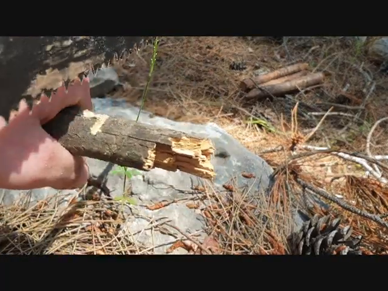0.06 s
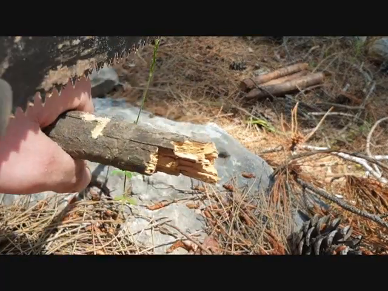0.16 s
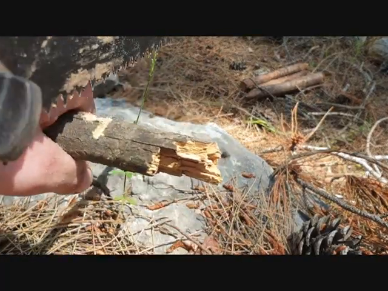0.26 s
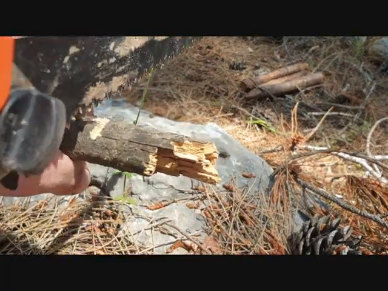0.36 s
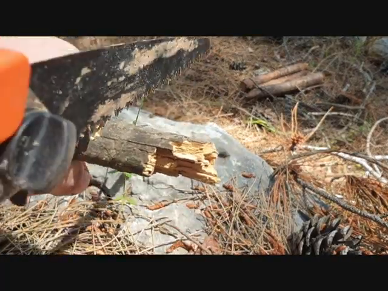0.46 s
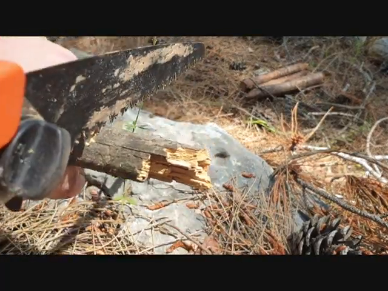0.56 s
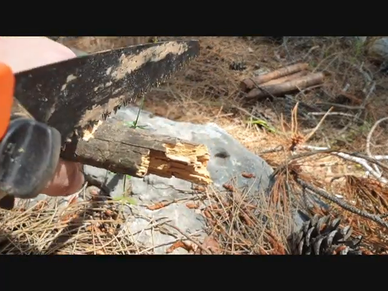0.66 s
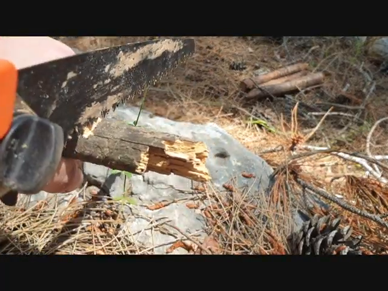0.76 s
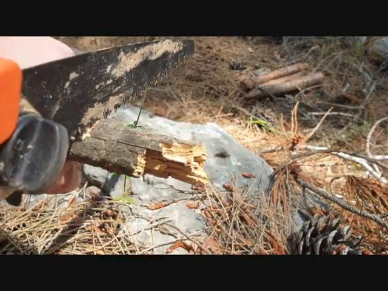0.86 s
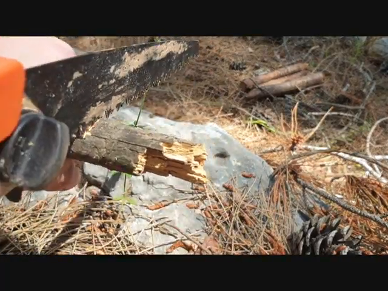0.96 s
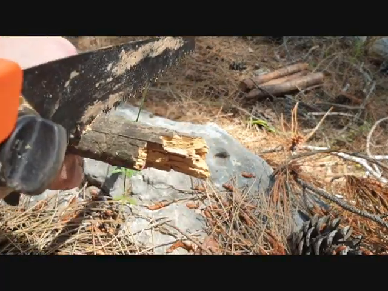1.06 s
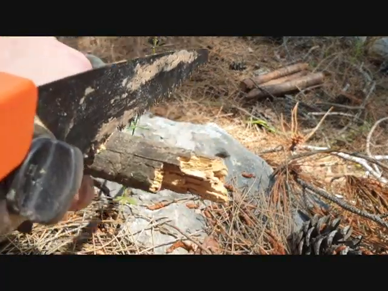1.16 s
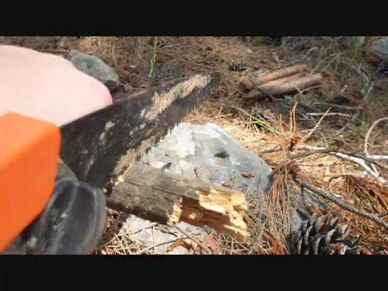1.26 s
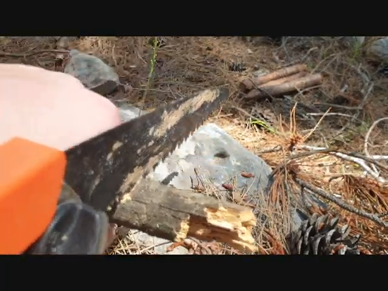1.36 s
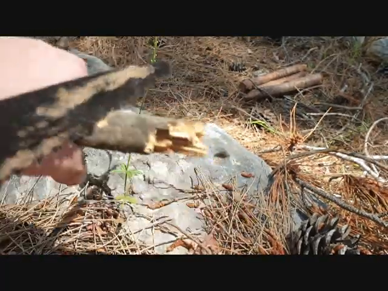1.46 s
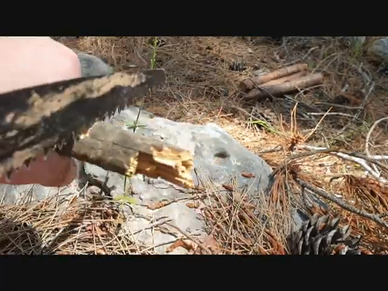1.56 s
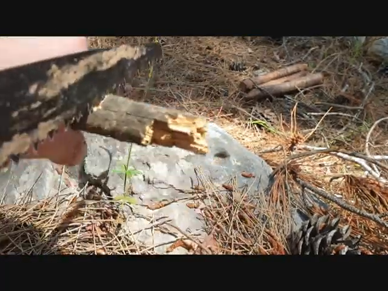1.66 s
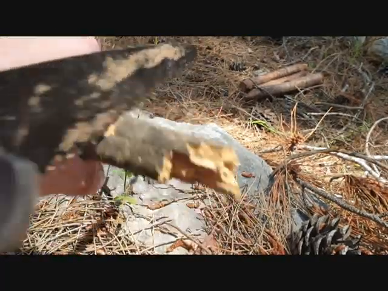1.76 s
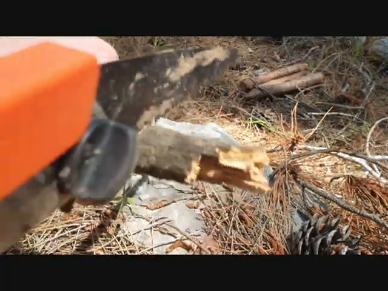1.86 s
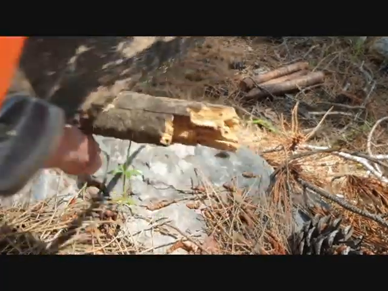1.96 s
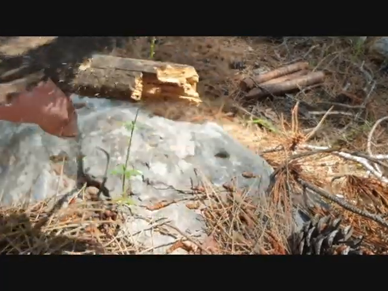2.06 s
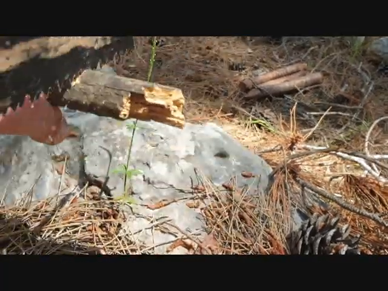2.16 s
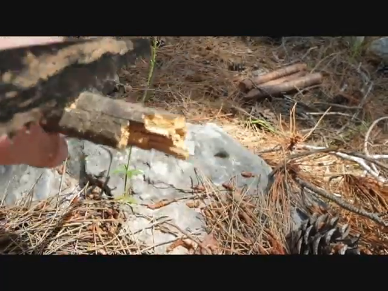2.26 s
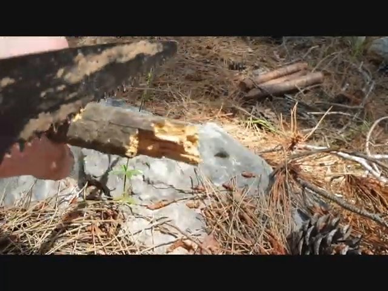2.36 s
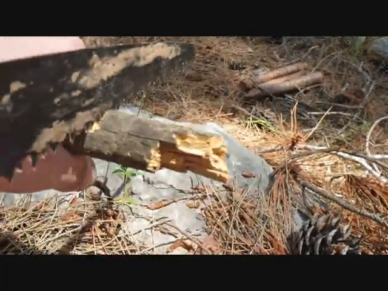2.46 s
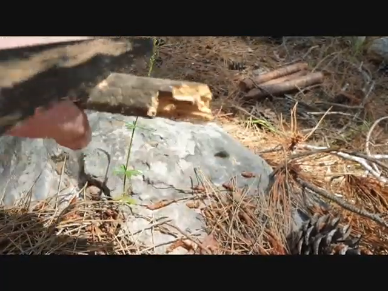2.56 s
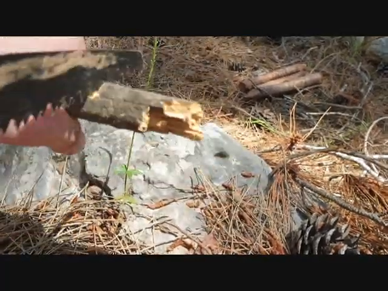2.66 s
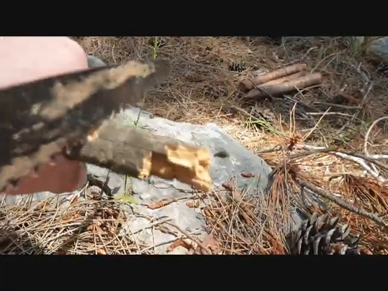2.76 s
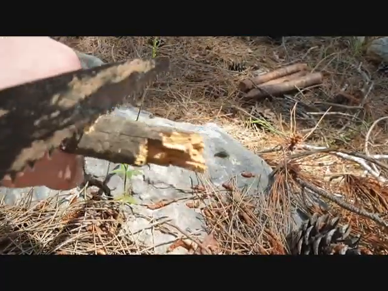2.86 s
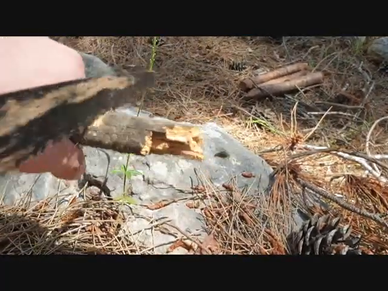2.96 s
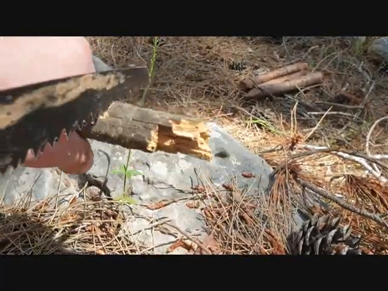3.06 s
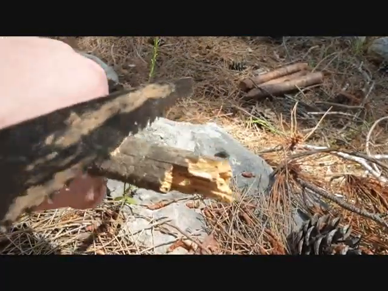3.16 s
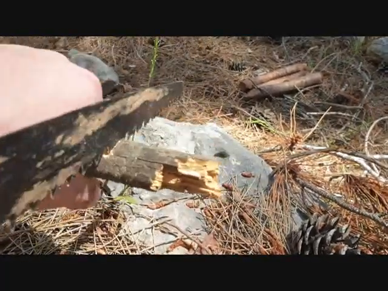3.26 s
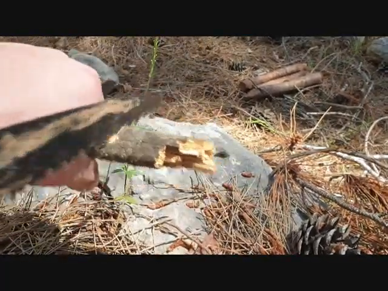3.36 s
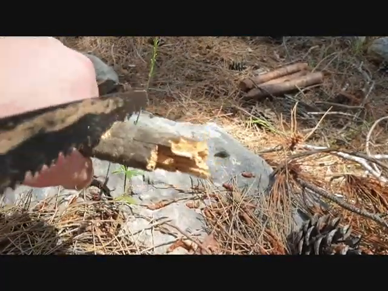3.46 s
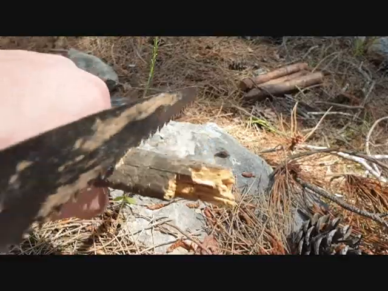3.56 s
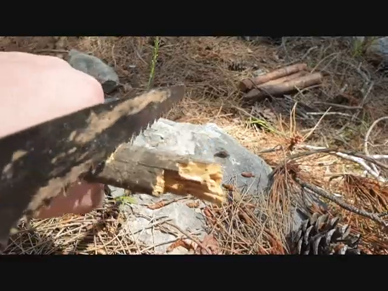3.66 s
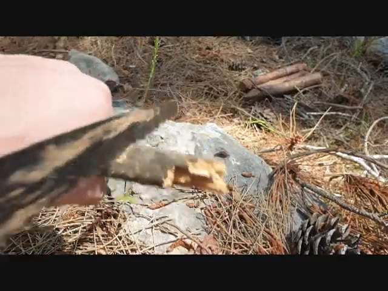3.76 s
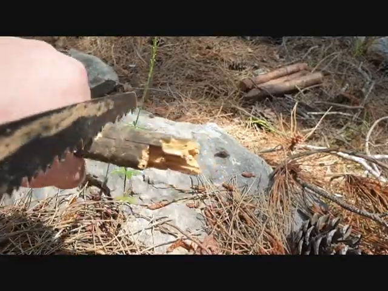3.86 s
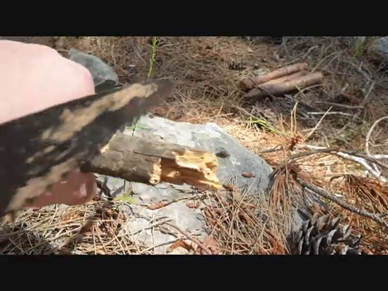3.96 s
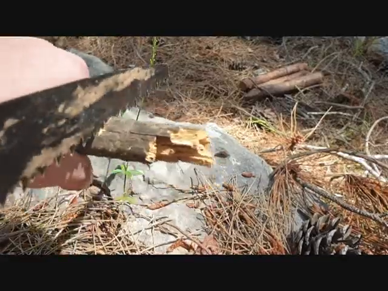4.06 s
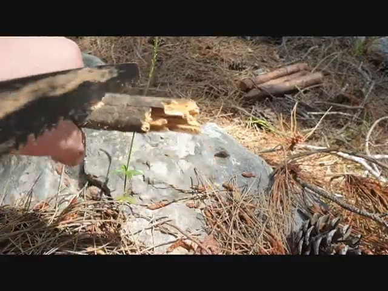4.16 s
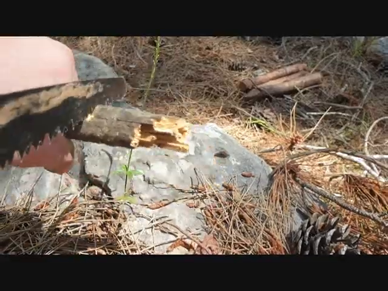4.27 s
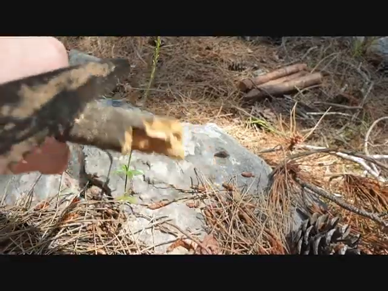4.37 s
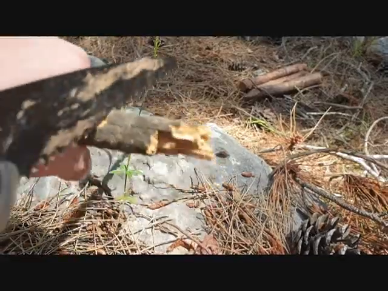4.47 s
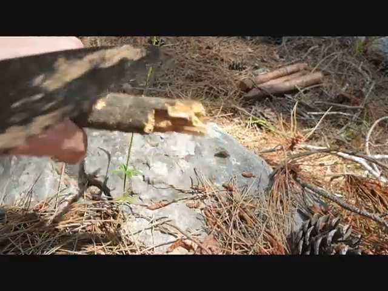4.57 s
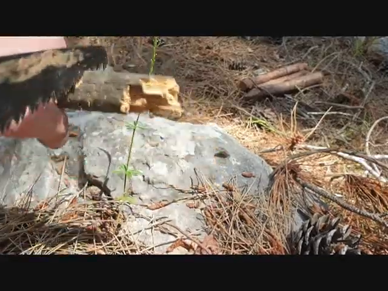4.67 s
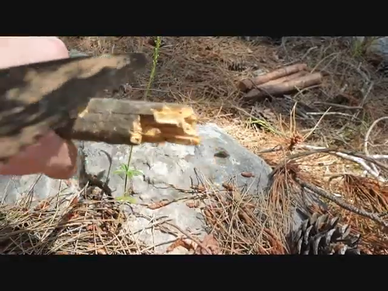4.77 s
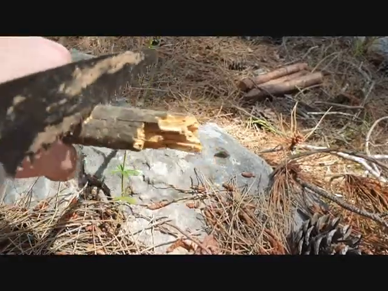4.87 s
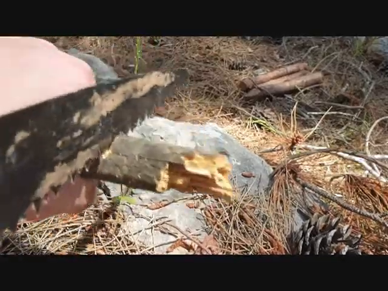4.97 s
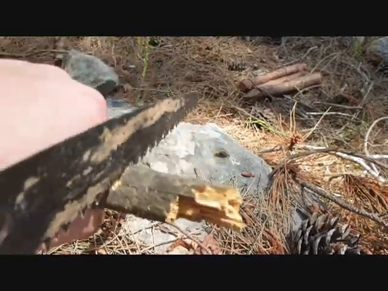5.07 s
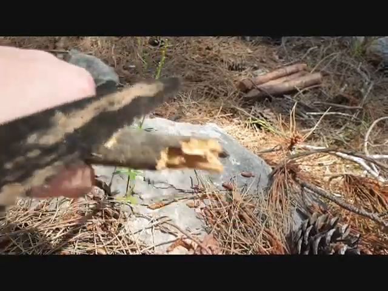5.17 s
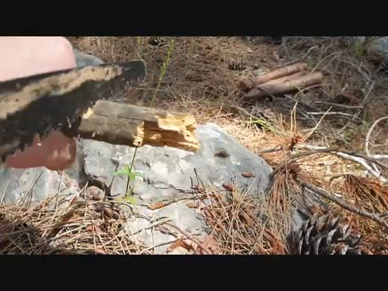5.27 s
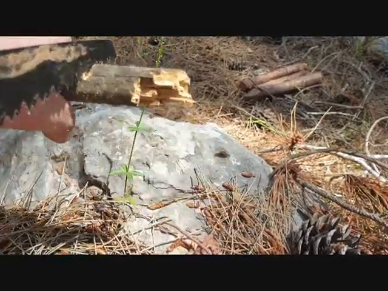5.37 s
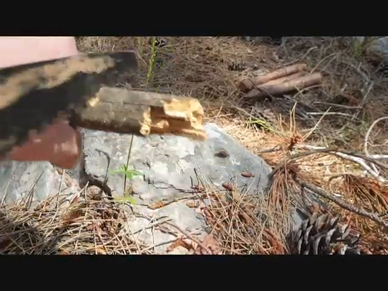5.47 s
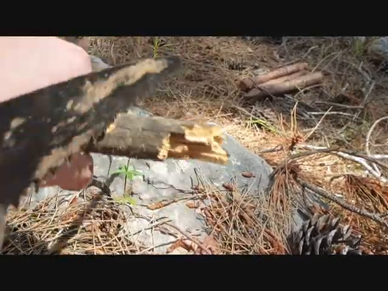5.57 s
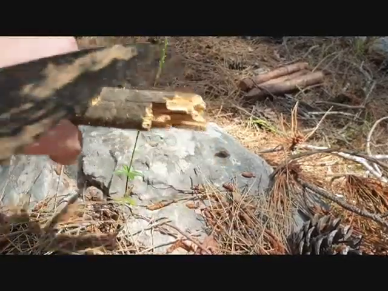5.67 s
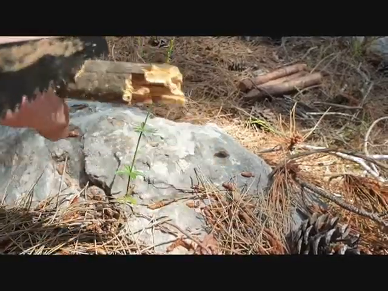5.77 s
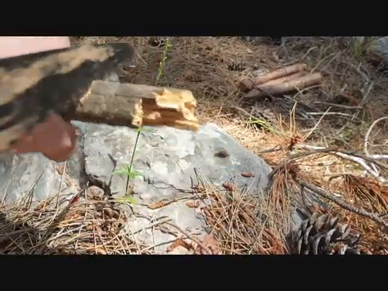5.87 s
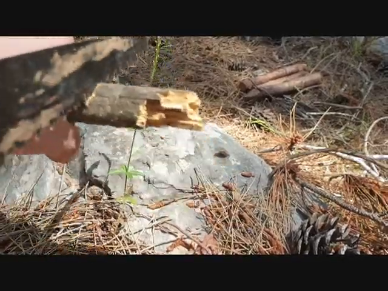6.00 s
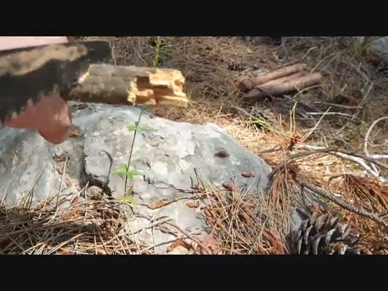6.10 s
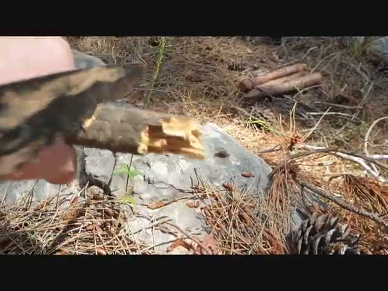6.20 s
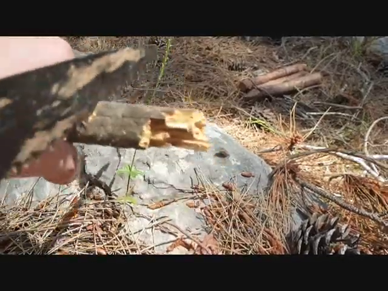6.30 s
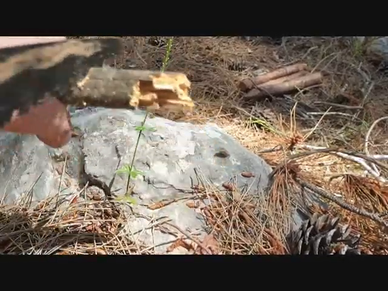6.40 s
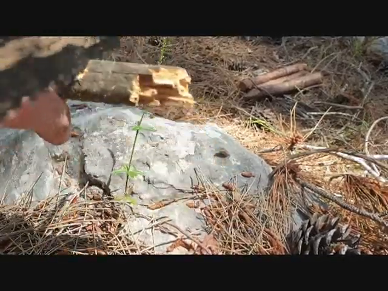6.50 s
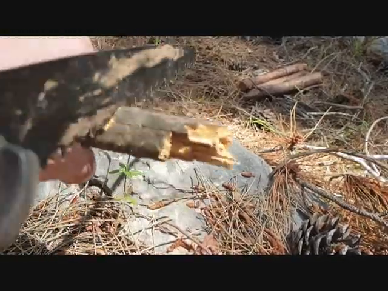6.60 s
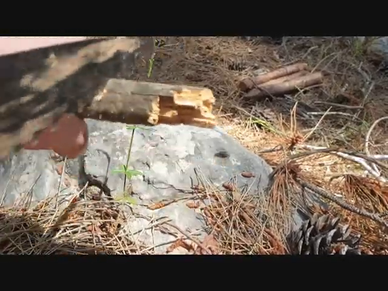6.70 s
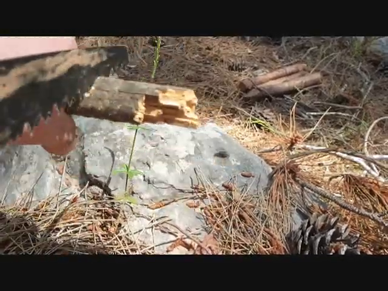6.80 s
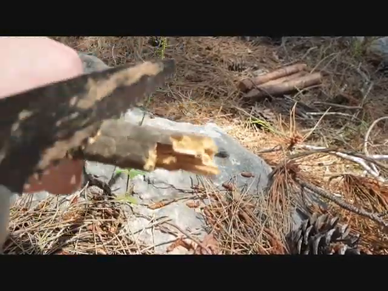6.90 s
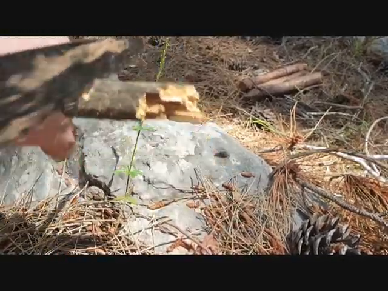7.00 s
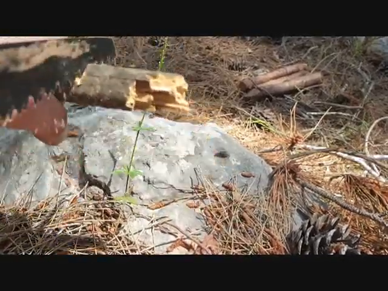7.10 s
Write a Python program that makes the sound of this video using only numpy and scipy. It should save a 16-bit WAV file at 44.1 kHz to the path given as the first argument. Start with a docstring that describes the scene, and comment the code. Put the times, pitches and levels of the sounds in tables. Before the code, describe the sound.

A saw catches dry wood with a crackling bite, then cuts in quick uneven strokes, tearing and ringing thinly, over very faint outdoor hum and hiss.

```python
"""Folding saw on a dry stick

A folding saw is set on a dry stick, then cuts back and forth in spells, close to the left port of a small
camera. Fibres break as dense random clicks, filtered into tearing, bite and wood, ringing modes of blade and
stick; stroke envelopes swell each cut, single teeth snag. Dull knocks and low rumble come through the hands.
Outdoors: a very faint noise scatter, a far hum and hiss of filtered noise."""
import sys
import numpy as np
from scipy import signal
from scipy.fft import rfft, irfft
from scipy.io import wavfile
from scipy.ndimage import uniform_filter1d

SR = 44100
rng = np.random.default_rng(int(sys.argv[2]) if len(sys.argv) > 2 else 0)


def waveform_to_disk(signal):
    """Save audio, clipped to [-1, 1], as 16-bit WAV at the path in sys.argv[1]."""
    frames = np.transpose(np.atleast_2d(signal))
    scaled = np.clip(frames, -1, 1) * 32767
    samples = np.round(scaled).astype(np.int16)
    wavfile.write(sys.argv[1], SR, samples)


def magnitude_from_level(level_db):
    """Linear magnitude for a level in decibels (20 dB per decade)."""
    exponent = np.asarray(level_db, float) / 20
    return 10 ** exponent


N = 314874

# Saw strokes: fastest moment t/s, rise/s, fall/s, relative tearing level/dB, wood body over it/dB
STROKES = [(1.001, 0.021, 0.039, -57.5, 1.5), (1.149, 0.002, 0.065, -52, -8.5),
           (1.544, 0.035, 0.089, -20.5, -17), (1.906, 0.078, 0.093, -30, -13),
           (2.145, 0.13, 0.12, -29, -11.5), (2.37, 0.097, 0.13, -34, -10.5),
           (2.657, 0.05, 0.085, -24, -14.5), (2.85, 0.041, 0.12, -28, -11),
           (3.086, 0.063, 0.084, -26.5, -14), (3.271, 0.071, 0.078, -29.5, -9),
           (3.492, 0.088, 0.062, -29, -14), (3.665, 0.097, 0.066, -28, -11),
           (3.89, 0.048, 0.09, -24.5, -15), (4.067, 0.063, 0.085, -26.5, -9),
           (4.246, 0.04, 0.1, -25.5, -14.5), (4.475, 0.061, 0.12, -27, -10),
           (4.718, 0.08, 0.078, -22.5, -16.5), (4.857, 0.041, 0.11, -22.5, -14.5),
           (5.285, 0.039, 0.096, -28.5, -11.5), (5.458, 0.097, 0.057, -33, -8.5),
           (5.613, 0.08, 0.095, -26.5, -7), (5.821, 0.072, 0.071, -21.5, -18),
           (5.996, 0.058, 0.078, -22, -12), (6.191, 0.086, 0.06, -23, -14),
           (6.341, 0.101, 0.068, -25.5, -11.5), (6.498, 0.057, 0.074, -21.5, -17.5),
           (6.654, 0.058, 0.081, -22, -12.5), (6.836, 0.13, 0.063, -24, -13.5),
           (6.986, 0.081, 0.064, -23, -10.5), (7.135, 0.086, 0.08, -25.5, -12)]
# A tooth snags and lets go: t/s, relative peak level/dB, reach into bite and wood/dB
SNAGS = [(0.594, -57, 5), (0.6103, -53.5, 3), (0.773, -55, 9), (0.7876, -47, -1), (0.8312, -60.5, 14.5),
         (0.9965, -50, 5), (1.009, -43.5, 10.5), (1.151, -30.5, 3), (1.1564, -41.5, 15), (1.1749, -42, -4),
         (1.5203, -25, 4), (1.529, -11, 2.5), (1.545, -13, 0.5), (1.5568, -8.5, -3.5), (1.5705, -11, 0.5),
         (1.58, -12.5, -2), (1.604, -21.5, 3.5), (1.6249, -26, 6), (1.8096, -44, -15), (1.8388, -36, -11),
         (1.8596, -28, 9), (1.892, -18, -6), (1.9005, -14.5, 4), (1.9195, -14.5, 5), (1.9724, -30, -5),
         (1.991, -37.5, 12), (2.003, -31.5, 7.5), (2.012, -33, 4), (2.125, -14.5, 6), (2.1694, -26.5, 9),
         (2.2993, -32, -4), (2.3218, -24, -6), (2.3328, -25, 4), (2.3489, -13, -1), (2.381, -24, -9),
         (2.4037, -17.5, -0.5), (2.4873, -33.5, -1), (2.6152, -23.5, 3), (2.646, -30, -4),
         (2.6589, -22.5, 13.5), (2.6788, -11.5, 4.5), (2.708, -15, 2.5), (2.763, -40.5, -9),
         (2.8165, -34, -6), (2.854, -20, 2), (2.866, -29, 4), (2.889, -24, -3), (3.0656, -12.5, 2.5),
         (3.094, -12.5, 2), (3.109, -22, 0), (3.1357, -24, 0), (3.2027, -34.5, -12), (3.274, -20, -3),
         (3.48, -10.5, -2.5), (3.49, -14.5, -8), (3.571, -32, -10), (3.5782, -26.5, -10), (3.6373, -11, -9),
         (3.6618, -17.5, 8), (3.7913, -53, -6), (3.8515, -36.5, -7), (3.8888, -24, -9), (3.9031, -11.5, 3),
         (4.04, -23, -2), (4.048, -21, -3), (4.0893, -21, -1), (4.2243, -19.5, 0), (4.375, -31.5, -8),
         (4.397, -40.5, 3), (4.435, -17.5, 2), (4.543, -23.5, 8.5), (4.706, -20, -2.5),
         (4.7193, -13.5, 2.5), (4.7328, -12.5, -8.5), (4.748, -16.5, 3.5), (4.823, -21.5, -8),
         (4.861, -23.5, -13), (4.8905, -19.5, -12), (4.9033, -15.5, 2), (5.257, -33, 3),
         (5.2946, -27, 15.5), (5.339, -17, -0.5), (5.5564, -24.5, -5), (5.58, -19.5, -10), (5.788, -22, -4),
         (5.82, -12.5, -16), (5.922, -27, -10), (5.9484, -21, -11), (5.97, -12, -9), (6.0287, -21, 1),
         (6.1707, -11.5, -6), (6.177, -18.5, -8), (6.318, -15.5, -11), (6.3656, -13, 1), (6.4768, -20, 10),
         (6.49, -19.5, 8.5), (6.511, -19.5, 10), (6.5328, -10, -3), (6.636, -14.5, -2), (6.664, -13, -11),
         (6.753, -24, -5), (6.8077, -15, 3), (6.8274, -12.5, 7), (6.8409, -12.5, 1.5), (7.118, -25, -2)]
# Teeth stick in the kerf, then break free at once: free at t/s, stuck for/s, level just before release/dB
STICKING = [(1.852, 0.07, -9), (2.612, 0.07, -18), (2.815, 0.03, -13), (3.632, 0.05, -5.5),
            (3.851, 0.05, -10), (4.222, 0.03, -3), (4.434, 0.06, -12), (4.822, 0.028, -10),
            (5.255, 0.06, -10), (5.967, 0.066, -8), (6.168, 0.04, -2), (6.44, 0.017, -11), (6.6, 0.02, -14)]
# Colour of the cut as the kerf deepens:
# t/s, bite/dB, blade ring/dB, low blade modes/dB, stick ring/dB, drag/dB
KERF_COLOUR = [(1.0, 0, 2, 4, 0, 2.5), (1.55, 2.5, -5.5, 11, -5, -6), (1.95, 0.5, -1.5, 2.5, 1, 3),
               (2.65, 1, -0.5, 3, -2, -8), (3.3, 0.5, -0.5, 2, 5.5, 3), (3.8, -0.5, -0.5, -0.5, 3.5, -3),
               (4.5, 2, 1.5, 2, 0.5, 8), (5.08, -4, -6, 1, 5.5, 1.5), (5.22, 0.5, -1, -2, -4, -3),
               (5.85, -0.5, 0.5, 2, -2, 5), (6.5, -0.5, 0, 0.5, 3, -7), (7.14, 1, 0.5, 2, 0.5, 3)]
# Spectral shapes of tearing, bite and wood body: f/Hz, relative level/dB
TEAR_SHAPE = [(1940, -51.5), (3300, -8), (3910, -4), (4940, -2), (8140, -5.5), (8590, -8.5), (9440, -4),
              (15100, -2.5), (16200, -2.5), (16500, -30)]
BITE_SHAPE = [(820, -32.5), (1400, -8.5), (1990, 1.5), (3140, 5.5), (3400, -0.5), (4000, -1.5),
              (5200, -23.5), (8800, -120)]
WOOD_SHAPE = [(65, -25), (110, -20.5), (151, -10.5), (258, 0.5), (380, -8.5), (469, 0.5), (674, 0.5),
              (1140, -3), (1800, -9), (2340, -29.5), (3960, -120)]
# Edges of the tearing registers, a tooth bites mostly in one: f/Hz
TEAR_EDGES_HZ = [2500, 5800, 8500, 11500, 18000]
# Ringing modes of the blade and of the stick: f/Hz, width/Hz, relative level/dB
BLADE_MODES = [(1652, 50, -13), (2874, 200, -6), (3220, 200, -20), (4570, 310, 3.5), (5080, 440, 5.5),
               (5590, 690, 1.5), (7150, 330, -7), (8100, 83, -8.5), (9200, 300, -9.5), (11560, 250, -17),
               (12500, 400, -4.5)]
STICK_MODES = [(485, 58, -5), (560, 80, -5.5), (780, 140, -10)]
# What the right port hears in step with the left: f/Hz, gain/dB
SHARED_GAIN = [(250, -7.5), (600, -7.5), (1200, -8.5), (4000, -12), (12000, -4.5)]
# What the right port hears from other parts of blade and stick: f/Hz, gain/dB
APART_GAIN = [(250, -14.5), (600, -7), (1200, 2), (4000, 3), (12000, 15.5)]
# Right port in the camera's shadow: f/Hz, gain/dB
SHADOW_GAIN = [(60, 6.5), (400, 10.5), (1300, 2.5), (2400, 1), (4400, -2), (8000, -14), (15000, -19.5)]
# Dull knocks through the hands: t/s, peak level/dB, f/Hz, spread/s, left minus right/dB
KNOCKS = [(2.0424, -16.5, 267, 0.0016, -7), (2.0425, -28.5, 534, 0.00074, -7), (2.048, -31, 160, 0.01, -6),
          (5.193, -37, 63.4, 0.0047, 26.5)]
# Shaking the hands pass to the camera: t/s, relative gain/dB, left minus right gain/dB
HAND_SHAKE = [(0, 14.5, 23), (0.17, 5.5, -2), (1.05, 6, -3), (1.25, 8.5, 11), (1.45, 11, 2.5),
              (1.75, -7, 8), (2.15, 5, 11), (2.4, -2.5, 6), (2.8, 2, 11.5), (3.45, -2, 8), (3.6, -14, 6),
              (3.9, -1, 7.5), (5.0, 0, 8.5), (5.45, 1.5, 6), (5.82, 3, 12), (6.0, -0.5, 10),
              (6.25, 4, 11.5), (6.6, 2.5, 7), (6.82, 9, 12), (7.0, -2, 1), (7.14, 6, 17)]
# Spectral shape of the shaking: f/Hz, relative level/dB
SHAKE_SHAPE = [(12, -40.5), (20, -12), (65, 3.5), (81, 2), (113, -11.5), (160, -8.5), (210, -42.5),
               (350, -120)]
# Spectral shape of far hum and hiss: f/Hz, relative level/dB
AIR_SHAPE = [(53, -22.5), (90, -7.5), (125, -13.5), (211, -12.5), (270, -17), (414, -32), (900, -37),
             (1750, -47), (2100, -44), (2400, -35), (2800, -42), (3600, -52), (5300, -50), (6700, -42),
             (7600, -52), (8700, -60.5), (14500, -43.5), (16500, -64.5)]
# Level of the hiss over time: t/s, gain/dB
HISS_LEVEL = [(0, 6), (0.15, 1.5), (0.4, -1), (1.2, 3.5), (1.7, -2), (2.55, -2.5), (3.8, -1), (5.15, 2),
              (7.14, -4)]

CLICKS_PER_S, CLICK_SPREAD_DB, TEETH_PER_S = 6000, -0.5, 220
STROKE_DEPTH_DB = 30  # sunk by this one rise or fall away from the fastest moment, at share 1
RISE_POWER, FALL_POWER = 1.75, 2.46  # roundness of the swell on either side
LIFT_DB = -92.5  # below this the teeth are off the wood
DRAG_DB, DRAG_S = -34, 0.12  # the blade slides on lightly after a stroke
SNAG_T60_S, SNAG_WOOD_DB, SNAG_BITE_DB = 0.031, -18, -10
LOW_MODES_HZ = 3500
PAN_DB, PAN_WANDER_DB, LAG_SAMPLES = 12.5, -0.5, 16  # right port: gain cut, its wander, delay


def saw():
    """Tearing, ring, bite and wood follow the same strokes; the right port hears them later and duller."""
    tear_db, wood_over_db = np.array(STROKES)[:, 3:].T
    bite_db, ring_db, low_db, stick_db, _ = curve(KERF_COLOUR)
    bites = teeth(3.8)

    grip = np.maximum(tearing() - magnitude_from_level(LIFT_DB), 0) * bites
    tear_teeth = [teeth(0.92) * magnitude_from_level(7.6 * walk(14)) for _ in TEAR_EDGES_HZ[1:]]
    bite_grip = strokes(tear_db, over_db=-9, share=0.79, late_s=0.0033) * bites * teeth(3.4)
    bite_grip *= magnitude_from_level(bite_db + 2.0 * walk(16))
    wood_grip = strokes(tear_db + wood_over_db, over_db=-1.66, share=0.72, late_s=0.0037) * bites
    wood_grip *= teeth(1.3) * magnitude_from_level(2.6 * walk(16))
    ring_grip = strokes(tear_db, over_db=-5.5, share=0.93, late_s=0.0095) * bites
    ring_grip *= magnitude_from_level(ring_db + 3.0 * walk(16))

    blade_reach = [magnitude_from_level(5.0 * walk(60) + 3.6 * walk(11) + low_db * (hz < LOW_MODES_HZ))
                   for hz, _, _ in BLADE_MODES]
    stick_reach = [magnitude_from_level(7.7 * walk(30)) for _ in STICK_MODES]
    snag_tear, snag_wood, snag_bite = snags()

    def voice():
        """One draw of the cut in all its registers."""
        force, crack = fibres(), rng.standard_normal(N)
        shapes = (TEAR_SHAPE, BITE_SHAPE, WOOD_SHAPE)
        tear, bite, wood = (unit(colour(force, shape)) for shape in shapes)
        crack_tear, crack_bite, crack_wood = (unit(colour(crack, shape)) for shape in shapes)

        registers = []
        for gain, low_hz, high_hz in zip(tear_teeth, TEAR_EDGES_HZ, TEAR_EDGES_HZ[1:]):
            band = signal.butter(2, (low_hz, high_hz), "band", fs=SR, output="sos")
            registers.append(gain * signal.sosfiltfilt(band, tear))
        tear = unit(sum(registers))

        wood = wood + magnitude_from_level(stick_db - 11) * ring(force, STICK_MODES, stick_reach)
        cut = 0.9 * grip * tear + bite_grip * bite + wood_grip * wood
        blade = (ring_grip + 0.12 * snag_tear) * ring(force, BLADE_MODES, blade_reach)
        snap = 0.51 * snag_tear * crack_tear + 0.5 * snag_bite * crack_bite + 0.49 * snag_wood * crack_wood
        return cut + blade + snap

    left = voice()
    right = shade(left, SHARED_GAIN) + shade(voice(), APART_GAIN)
    right = shade(right, SHADOW_GAIN) * magnitude_from_level(-PAN_DB - PAN_WANDER_DB * walk(13))
    right = np.pad(right, (LAG_SAMPLES, 0))[:N]
    return magnitude_from_level(6.0) * np.array([left, right])


def tearing():
    """Level of the tearing: the strokes and the light drag that follows them."""
    grip = strokes(np.array(STROKES)[:, 3])
    keep = np.exp(-1 / (DRAG_S * SR))
    drag = signal.lfilter([1 - keep], [1, -keep], grip)
    return grip + magnitude_from_level(DRAG_DB + curve(KERF_COLOUR)[-1]) * drag


def strokes(db, over_db=0, share=1, late_s=0):
    """Gain of all strokes: each swells to its fastest moment and sinks again as the blade slows."""
    t = np.arange(0, N + 32, 32) / SR  # one point every 32 samples
    s, rise, fall = np.array(STROKES)[:, :3].T[:, :, None]
    d = t - s - late_s
    sunk = np.where(d < 0, (np.abs(d) / rise) ** RISE_POWER, (np.abs(d) / fall) ** FALL_POWER)
    swell_db = db[:, None] + over_db - share * STROKE_DEPTH_DB * np.minimum(sunk, 10)
    gain = magnitude_from_level(swell_db).sum(axis=0)
    # sinks while stuck, back at once when free
    stuck_db = sum(depth_db * np.clip(1 + (t - free_s) / length_s, 0, 1) ** .5 * (t < free_s)
                   for free_s, length_s, depth_db in STICKING)
    return np.interp(np.arange(N) / SR, t, gain * magnitude_from_level(share * stuck_db))


def fibres():
    """Fibres break as clicks of uneven size over a fine scrape of dust."""
    struck = rng.random(N) < CLICKS_PER_S / SR
    size = magnitude_from_level(CLICK_SPREAD_DB * np.minimum(rng.exponential(size=N), 3.5))
    clicks = unit(struck * size * rng.standard_normal(N))
    return unit(clicks + 1.13 * rng.standard_normal(N))


def teeth(steady):
    """Teeth bite at uneven moments: each loads the cut at once and lets go within a few ms."""
    bites = (rng.random(N) < TEETH_PER_S / SR) * np.minimum(rng.exponential(size=N), 2.5)
    load = signal.lfilter([1], [1, -np.exp(-1 / (0.0028 * SR))], bites)
    return unit(steady + load)


def snags():
    """Envelopes of the snags in tearing, wood and bite: a sharp snap, then a dying release."""
    out = np.zeros((3, N + SR))
    t = np.arange(SR // 10) / SR
    release = magnitude_from_level(-60 * t / SNAG_T60_S)
    snap = 0.33 * np.exp(-t / 0.00067)
    burst = (release + snap) * np.minimum(t / 0.0003, 1)
    for s, db, depth_db in SNAGS:
        reach_db = db + np.array([[0], [SNAG_WOOD_DB + depth_db], [SNAG_BITE_DB + depth_db]])
        start = int(s * SR)
        out[:, start:start + len(t)] += burst * magnitude_from_level(reach_db)
    return out[:, :N]


def ring(force, modes, reach):
    """Modes of blade or stick; each is reached more or less as the contact point travels."""
    total = 0
    for (hz, width_hz, db), gain in zip(modes, reach):
        mode = signal.lfilter(*signal.iirpeak(hz, hz / width_hz, fs=SR), force)
        total = total + magnitude_from_level(db) * gain * unit(mode)
    return unit(total)


def knocks():
    """Each knock is a low swing that swells fast and dies more slowly."""
    t = np.arange(N) / SR
    total = 0
    for s, db, hz, spread_s, pan_db in KNOCKS:
        side_s = np.where(t < s, spread_s, 1.23 * spread_s)
        envelope = 1 / np.cosh(np.clip((t - s) / side_s, -30, 30))
        gain = magnitude_from_level(db + np.array([[pan_db], [-pan_db]]) / 2)
        total = total + gain * np.cos(2 * np.pi * hz * (t - s)) * envelope
    return total


def rumble():
    """Low shaking that rises with the cut, partly common to both ports."""
    hands_db, pan_db = curve(HAND_SHAKE)
    cut_db = uniform_filter1d(20 * np.log10(tearing() + magnitude_from_level(-76)), int(0.03 * SR))  # smoothed over 0.03 s
    db = -34 + 0.41 * cut_db + hands_db
    common, own = (unit(colour(rng.standard_normal(N), SHAKE_SHAPE)) for _ in range(2))
    return magnitude_from_level(db + np.array([pan_db, -pan_db]) / 2) * np.array([common, 0.54 * common + .5 * own])


def air():
    """Far hum much alike at both ports; the hiss is largely unrelated, its level changes along a curve."""
    mid, side = (unit(colour(rng.standard_normal(N), AIR_SHAPE)) for _ in range(2))
    side = colour(side, [(300, -11.5), (1200, 1.0)])
    both = np.array([mid + side, mid - side])
    hum = signal.sosfiltfilt(signal.butter(2, 900., fs=SR, output="sos"), both)
    hiss = (both - hum) * magnitude_from_level(curve(HISS_LEVEL)[0] + 1.5 * walk(3.0))
    return magnitude_from_level(-62 + 1.3 * walk(2.2) + np.array([[1.5], [-1.5]])) * (hum + hiss)


def unit(x):
    """Scale to rms 1."""
    return x / np.sqrt(np.mean(x ** 2))


def colour(x, points):
    """Causal minimum-phase filter through (f/Hz, gain/dB) points."""
    hz = np.maximum(np.arange(8193) * SR / 16384, 1)
    p = np.array(points, float)
    db = np.interp(np.log(hz), np.log(p[:, 0]), p[:, 1])
    cepstrum = irfft(np.log(magnitude_from_level(db)))
    cepstrum[1:8192] *= 2  # fold onto positive time
    cepstrum[8193:] = 0
    return signal.fftconvolve(x, irfft(np.exp(rfft(cepstrum))))[:N]


def shade(x, points):
    """Filter through (f/Hz, gain/dB) points that adds no delay."""
    p = np.array(points, float)
    hz = np.maximum(np.arange(N // 2 + 1) * SR / N, 1)
    db = np.interp(np.log(hz), np.log(p[:, 0]), p[:, 1])
    return irfft(rfft(x) * magnitude_from_level(db), N)


def walk(rate_hz):
    """Random levels held 1 / rate_hz and smoothed twice over that time."""
    k = int(SR / rate_hz)
    held = np.repeat(rng.standard_normal(N // k + 1), k)
    return 0.75 * uniform_filter1d(uniform_filter1d(held, k), k)[:N]


def curve(rows):
    """Columns of a (t/s, value, ..) table, one value a sample."""
    s, *columns = np.transpose(rows)
    return [np.interp(np.arange(N) / SR, s, c) for c in columns]


def scene():
    """Saw, knocks and shaking over the open air, with a faint scatter from ground and rock."""
    cut = saw()
    t = np.arange(SR // 4) / SR
    scatter = rng.standard_normal((2, len(t))) * magnitude_from_level(-55.5 - 60 * t / 0.19) * (t > .004)
    echo = signal.fftconvolve(cut, scatter, axes=1)[:, :N]
    return cut + echo + knocks() + rumble() + air()


def band_limit(x):
    """A steep low-pass at the top of the band."""
    return signal.sosfilt(signal.butter(12, 16660, fs=SR, output="sos"), x)


def record(dry):
    """The camera cuts the deepest bass and the top, and clips at full scale."""
    x = signal.sosfilt(signal.butter(2, 35., "high", fs=SR, output="sos"), dry)
    x = signal.sosfilt(signal.ellip(10, .2, 45, 15750, fs=SR, output="sos"), x)
    return band_limit(np.clip(x, -1, 1))


dry = scene()
out = record(dry)
waveform_to_disk(out)
```